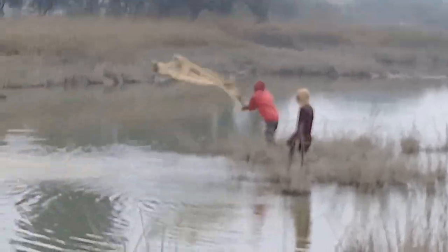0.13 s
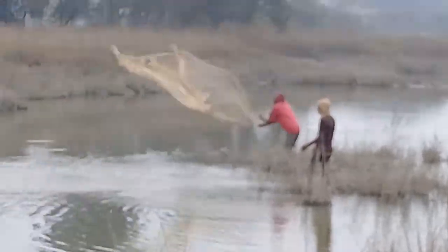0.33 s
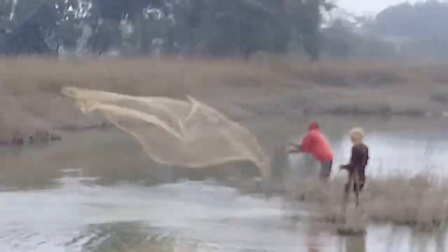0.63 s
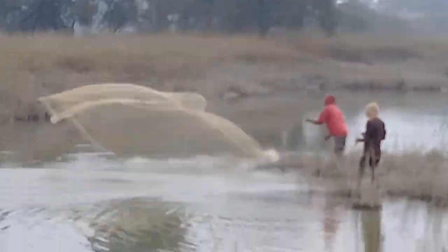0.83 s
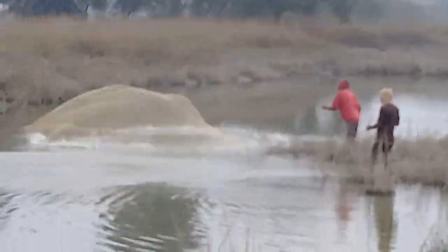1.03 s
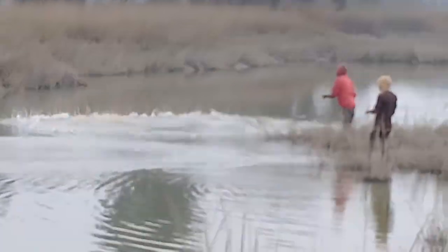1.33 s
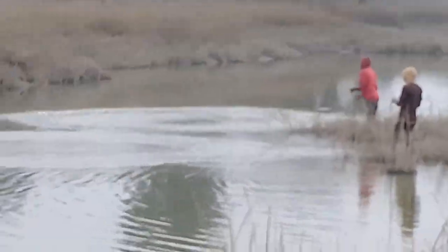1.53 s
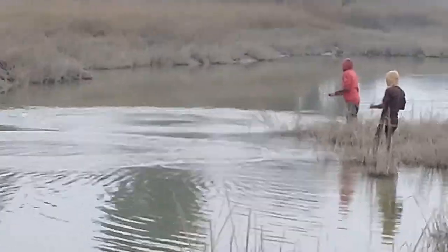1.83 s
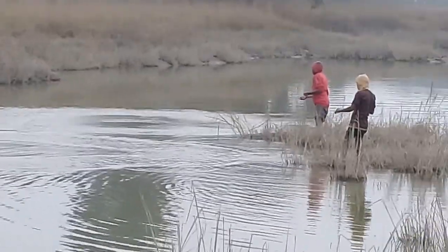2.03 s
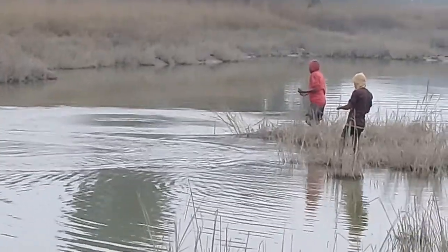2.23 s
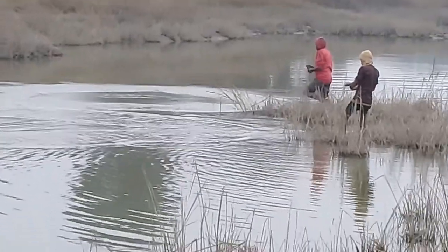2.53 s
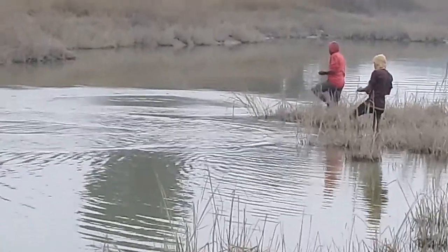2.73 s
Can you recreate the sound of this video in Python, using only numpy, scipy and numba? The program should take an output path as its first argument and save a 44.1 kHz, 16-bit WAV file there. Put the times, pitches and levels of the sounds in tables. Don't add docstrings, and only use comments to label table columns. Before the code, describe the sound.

Wind buffets a phone microphone at a pond bank: an early gust and thud, then a distant cast net lands with a faint soft wash around one second, before thuds crowd together and grow louder.

```python
import sys
import numpy as np
from scipy import signal
from scipy.io import wavfile
from scipy.ndimage import uniform_filter1d, minimum_filter1d
from numba import njit

SR = 44100
rng = np.random.default_rng(int(sys.argv[2]) if len(sys.argv) > 2 else 0)


def boost_factor(decibels):
    exponent = np.asarray(decibels, float) / 20
    return 10 ** exponent


def master(y):
    cut = np.clip(np.atleast_2d(y).T, -1, 1)
    pcm = np.round(cut * 32767)
    wavfile.write(sys.argv[1], SR, pcm.astype(np.int16))


N = 127008

# t/s, rumble level/dB, eddy corner re 249 Hz/dB
GUSTS = [(0, -25, -2), (.25, -16, -1.5), (.42, -15.5, 1), (0.548, -24, -2.5), (0.741, -20.5, -0.5),
         (0.949, -23.5, -2.5), (1.059, -16, -1), (1.169, -29.5, 2.5), (1.251, -18.5, 2),
         (1.479, -22.5, -0.5), (1.547, -40.5, -4), (1.582, -30, 0), (1.69, -19.5, 0), (1.852, -16.5, 2.5),
         (2.281, -18.5, 3), (2.44, -12.5, 4.5), (2.6, -14, 5.5), (2.8, -13.5, 4.5)]
# front t/s, peak level/dB, corner re 391 Hz/dB, length/s
EDDY_THUDS = [(0.22, -3, 2.5, 0.0037), (0.604, -22, 4.5, 0.0056), (.689, -13.5, -5.5, 0.0079),
              (1.229, -13, -2, 0.013), (1.264, -11, -5, 0.0068), (1.32, -6.5, 0, 0.011),
              (1.351, -11, 0.5, 0.011), (1.405, -0.5, -0.5, 0.0047), (1.452, -3.5, 0, 0.0082),
              (1.479, -6, -2.5, 0.005), (1.575, -7.5, -3.5, 0.01), (1.632, -6.5, -4, 0.011),
              (1.729, -1.5, 0.5, 0.025), (1.801, -2.5, 0.5, 0.0025), (1.84, -2.5, -2, .012),
              (1.871, -9, 2.5, 0.0096), (1.933, -5, 1.5, 0.013), (1.981, -3.5, 1.5, 0.0048),
              (2.016, -3.5, 0.5, 0.009), (2.097, -7, 0.5, 0.02), (2.138, -11.5, 2, 0.015),
              (2.183, -12, 2, 0.012), (2.237, -6.5, 0.5, .005), (2.34, -4.5, 0, 0.015),
              (2.416, -8.5, -2, 0.023), (2.445, -2.5, -1.5, .012), (2.512, -5.5, 3.5, 0.015),
              (2.577, -11, 4, 0.0028), (2.693, -5, 1.5, 0.013), (2.754, -3, 2.5, 0.024)]
# t/s, wash level/dB, spray re wash/dB, mist re wash/dB
NET_SWING = [
    (0, -42, -14.5, -18),
    (.13, -42.5, -11, -21.5),
    (.175, -40, -11.5, -21.5),
    (0.208, -48, -20.5, -36.5),
    (.5, -51, -14, -38.5),
    (0.681, -52.5, -11, -32.5),
    (.72, -62.5, -6, -39),
    (.82, -62.5, 3.5, -30),
    (.845, -66, -9, -34),
]
NET_LANDING = [
    (.9, -65, -2, -35),
    (.915, -53.5, -13, -37.5),
    (1.05, -48, -6.5, -34.5),
    (1.18, -47.5, -10, -27),
    (1.225, -47.5, -5.5, -15.5),
    (1.275, -46.5, -16, -26.5),
    (1.38, -53, -13.5, -38),
    (1.739, -55.5, -14, -34),
    (1.86, -63.5, -16, -28.5),
]
# f/Hz, width/Hz, level/dB
WASH_PEAKS = [(830, 350, -1), (1526, 400, -0.5), (2258, 310, -1), (2772, 360, -9), (3600, 1500, -14.5)]
# f/Hz, width/Hz, level/dB
SPRAY_PEAKS = [(4770, 1700, -4.5), (5900, 800, 0.5), (7020, 1300, -10)]
# f/Hz, width/Hz, level/dB
MIST_PEAKS = [(10000, 1400, -9), (14070, 5000, -5)]
# t/s, peak level/dB, f/Hz
LONE_DRIPS = [(.162, -47.5, 5700), (0.311, -47, 2700), (0.429, -52.5, 6600), (.597, -75.5, 6550),
              (.8, -67, 6100), (.855, -49.5, 5870), (1.345, -56, 7240), (1.732, -52, 5960),
              (2.149, -54.5, 5900), (2.171, -68.5, 6000), (2.07, -65, 6200), (2.35, -70.5, 5670)]


def unit(x):
    return x / np.sqrt(np.mean(x ** 2))


def smooth_twice(x, size):
    return uniform_filter1d(uniform_filter1d(x, size=size), size=size)


@njit
def svf(x, hz, damp):
    y, band, low_state = np.empty((3, len(x))), 0., 0.
    for i in range(len(x)):
        g = np.tan(np.pi * hz[i] / SR)
        v = (band + g * (x[i] - low_state)) / (1 + g * (g + damp))
        low = low_state + g * v
        band, low_state = 2 * v - band, 2 * low - low_state
        y[0, i], y[1, i], y[2, i] = low, damp * v, x[i] - damp * v - low
    return y


def bandpass(x, hz, width_hz):
    return svf(x, np.full(len(x), 1. * hz), width_hz / hz)[1]


def highpass(x, hz, width_hz):
    return svf(x, np.full(len(x), 1. * hz), width_hz / hz)[2]


def walk(rate_hz):
    hold = int(SR / rate_hz)
    held = rng.standard_normal(N // 100)[np.arange(N) // hold]
    return unit(smooth_twice(held, hold))


def wind(t):
    gust_s, gust_db, bright_db = np.array(GUSTS).T
    eddy_db = 1.5 * walk(55) + 2.64 * walk(150)
    eddy_db = eddy_db - uniform_filter1d(eddy_db, size=5000)
    lift = boost_factor(np.interp(t, gust_s, bright_db) + 0.36 * eddy_db)
    pressure = rng.standard_normal(N) * boost_factor(eddy_db) / np.sqrt(lift)
    rumble = port(pressure, 249 * lift, 1.6)
    steadiness = 0.6
    rumble = rumble / smooth_twice(rumble ** 2, 3000) ** (steadiness / 2)
    level = boost_factor(np.interp(t, gust_s, gust_db))
    sway_hz, sway_db = 52, -16.5
    sway = bandpass(bandpass(rng.standard_normal(N), sway_hz, 40), sway_hz, 45)
    return unit(rumble) * level + boost_factor(sway_db) * unit(sway) * uniform_filter1d(level, size=9000)


def thuds():
    size, rise_s, thud_db = 4096, -0.002, -2.5
    front_kick, front_share, front_lift_db = 11.5, 0.5, 3.5
    out = np.zeros(N + 2 * size)
    u = (np.arange(size) - size // 2) / SR
    chance = rng.standard_normal((len(EDDY_THUDS), size))
    for (front_s, db, bright_db, length_s), noise in zip(EDDY_THUDS, chance):
        swell = noise * np.exp(-(u / length_s) ** 2)
        push = swell + front_kick * np.sign(noise[0]) * (u == 0)
        front = np.exp(-(u / (front_share * length_s)) ** 2)
        corner_hz = 391 * boost_factor(bright_db + front_lift_db * (front - 0.5))
        x = port(push, corner_hz, 1.264)
        i = int((front_s + rise_s) * SR) + size // 2
        out[i:i + size] += x / np.abs(x).max() * boost_factor(db + thud_db)
    return out[size:N + size]


def port(pressure, corner_hz, damp):
    hz = np.clip(corner_hz, 60, 2500)

    def low(x, ratio):
        once = svf(x, ratio * hz, damp)[0]
        return svf(once, ratio * hz, damp)[0]

    skirt_db = -28
    x = low(pressure, 1.046) + boost_factor(skirt_db) * low(pressure, 2.3)
    x = low(x, 3.75)
    return highpass(highpass(x, 118.8, 113), 24.8, 35)


def water(t):
    s, wash_db, spray_db, mist_db = np.array(NET_SWING + NET_LANDING).T
    fade_s = 0.33
    level_db = np.interp(t, s, wash_db) - 20 * np.maximum(t - s[-1], 0) / fade_s
    surge_db = 1.6 * walk(17.88)
    wash = drop_layer(WASH_PEAKS)
    spray = boost_factor(np.interp(t, s, spray_db)) * drop_layer(SPRAY_PEAKS)
    mist = boost_factor(np.interp(t, s, mist_db)) * drop_layer(MIST_PEAKS)
    return boost_factor(level_db + surge_db) * (wash + spray + mist)


def drop_layer(peaks):
    drops_per_s, spread_db, drop_share = 3000, 2.4, 0.5
    out = 0
    for hz, width_hz, peak_db in peaks:
        hits = rng.random(N) < drops_per_s / SR
        drops = hits * boost_factor(spread_db * rng.exponential(size=N)) * rng.standard_normal(N)
        x = drop_share * unit(drops) + (1 - drop_share) * rng.standard_normal(N)
        x = bandpass(bandpass(x, hz, 1.3 * width_hz), hz, 1.3 * width_hz)
        out = out + unit(x) * np.sqrt(width_hz) * boost_factor(peak_db + 1.5 * walk(25))
    return unit(out)


def drips():
    size, t60_s, rise_s = 2048, 0.02, 0.0025
    out = np.zeros(N + size)
    u = np.arange(size) / SR
    envelope = boost_factor(-60 * u / t60_s) * np.minimum(u / rise_s, 1)
    chance = rng.standard_normal((len(LONE_DRIPS), size))
    for (s, db, hz), noise in zip(LONE_DRIPS, chance):
        x = bandpass(bandpass(noise, hz, 0.22 * hz), hz, 0.22 * hz) * envelope
        i = int(s * SR)
        out[i:i + size] += x / np.abs(x).max() * boost_factor(db)
    return out[:N]


def scene():
    t = np.arange(N) / SR
    return (wind(t) + thuds() + water(t) + drips())[None]


def top_cut(x):
    return signal.sosfilt(signal.butter(12, 15720, fs=SR, output="sos"), x)


def record(dry):
    limit_db, hiss_db = -1.8, -75
    room = np.minimum(1, boost_factor(limit_db) / (np.abs(dry) + 1e-9))
    gain = smooth_twice(minimum_filter1d(room, size=600), 300)
    mix = dry * gain + boost_factor(hiss_db) * rng.standard_normal(dry.shape)
    return top_cut(mix)


dry = scene()
out = record(dry)
master(out)
```